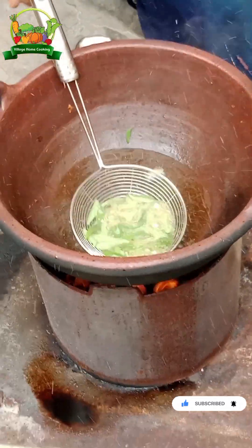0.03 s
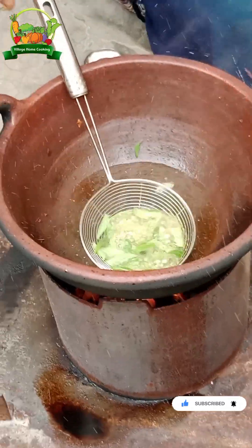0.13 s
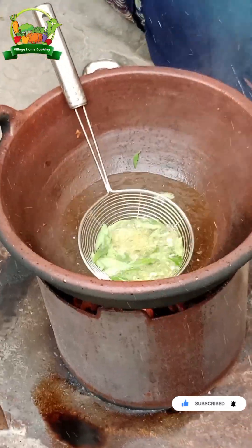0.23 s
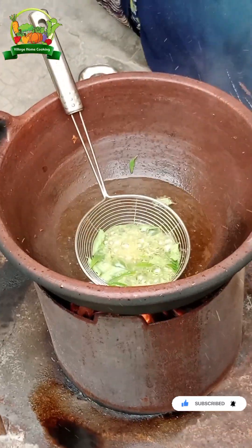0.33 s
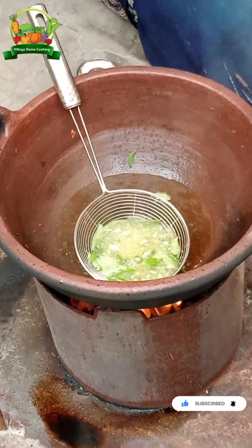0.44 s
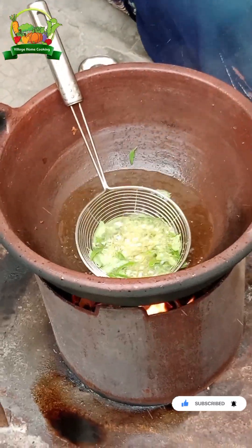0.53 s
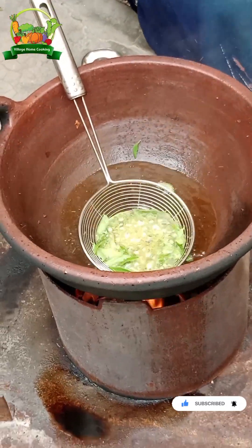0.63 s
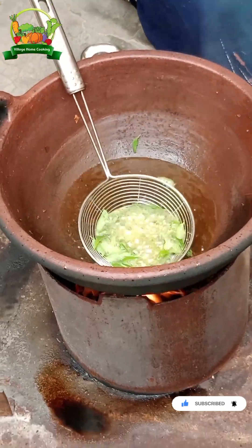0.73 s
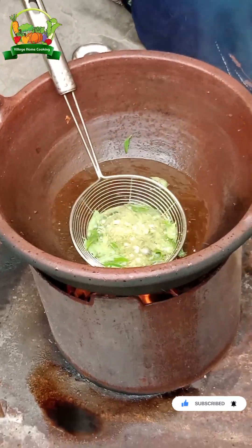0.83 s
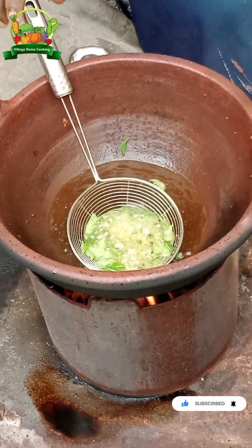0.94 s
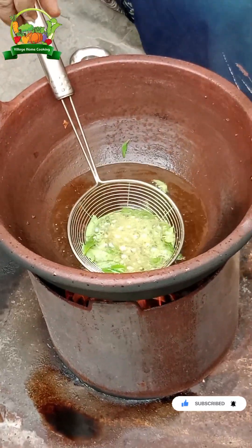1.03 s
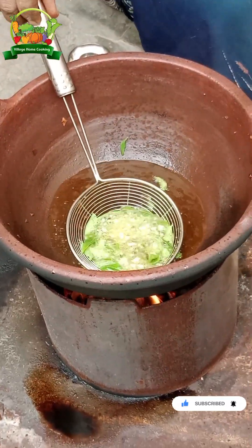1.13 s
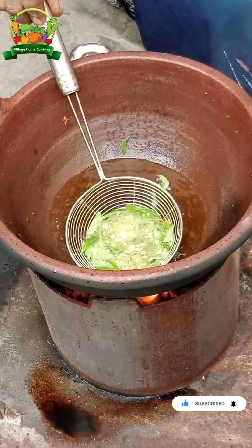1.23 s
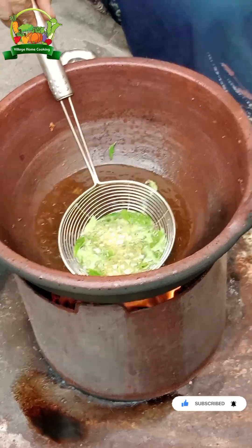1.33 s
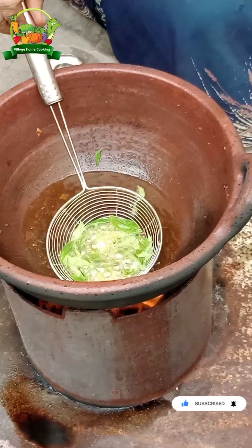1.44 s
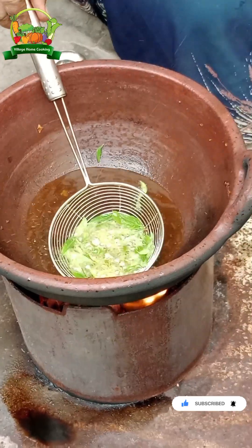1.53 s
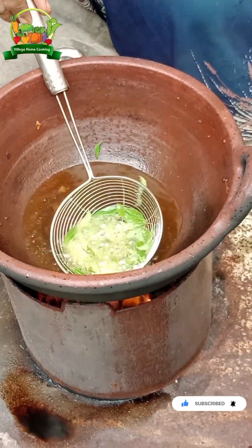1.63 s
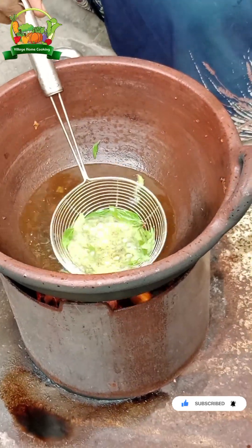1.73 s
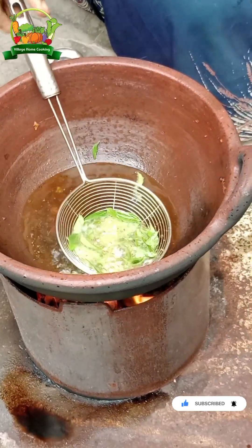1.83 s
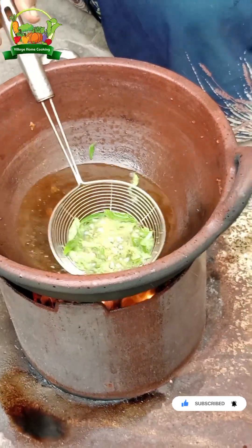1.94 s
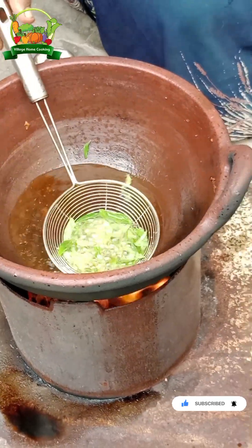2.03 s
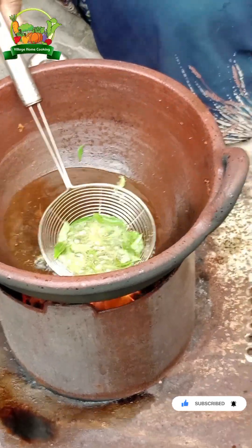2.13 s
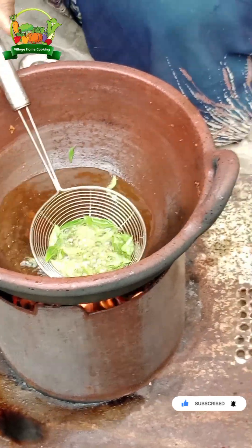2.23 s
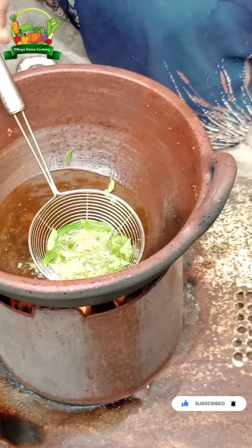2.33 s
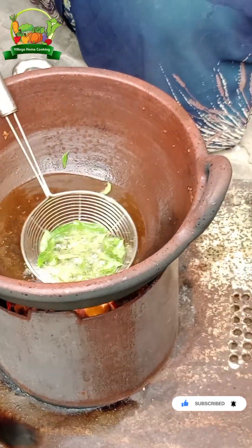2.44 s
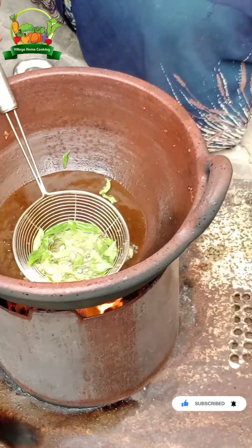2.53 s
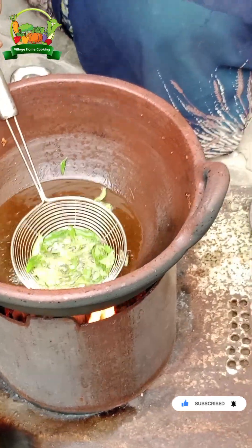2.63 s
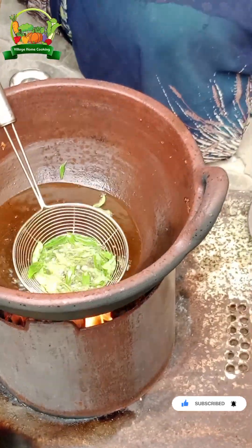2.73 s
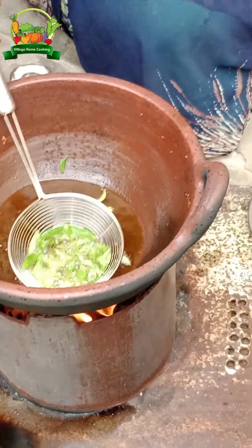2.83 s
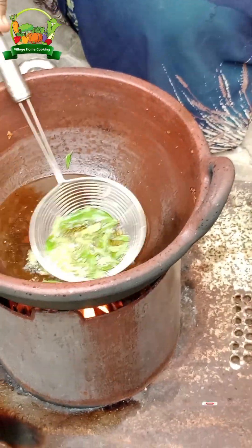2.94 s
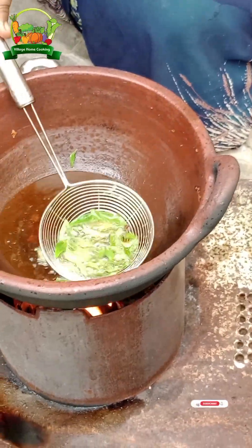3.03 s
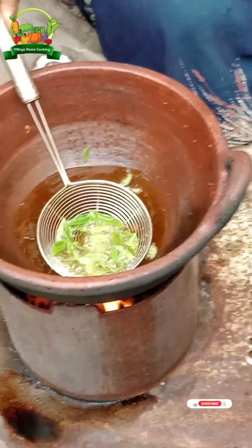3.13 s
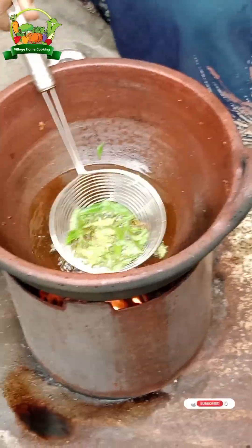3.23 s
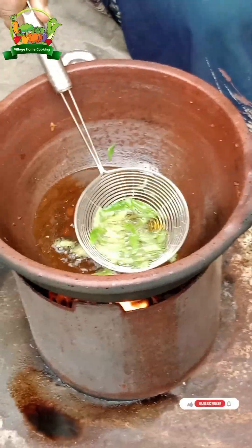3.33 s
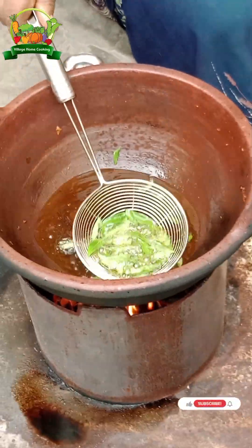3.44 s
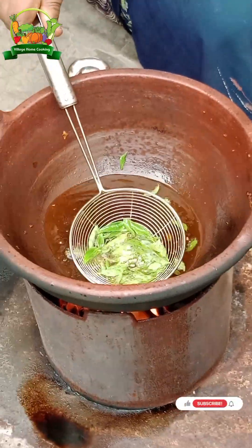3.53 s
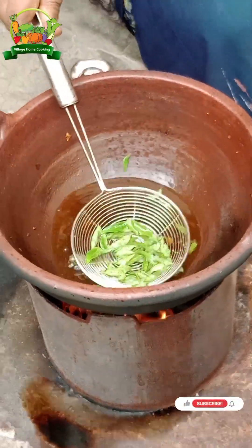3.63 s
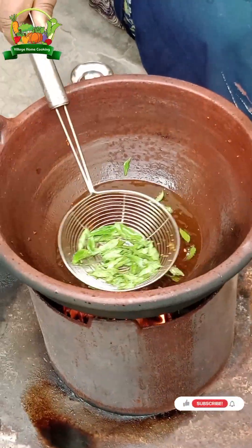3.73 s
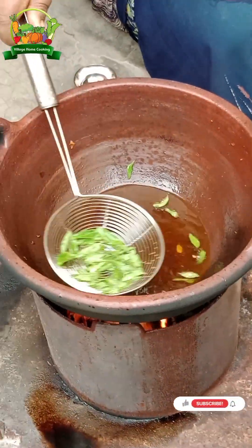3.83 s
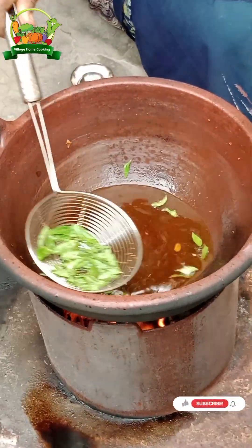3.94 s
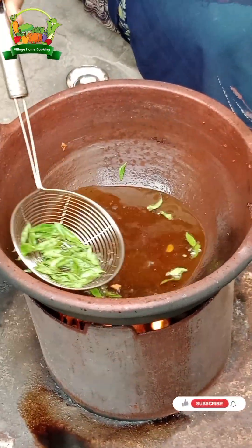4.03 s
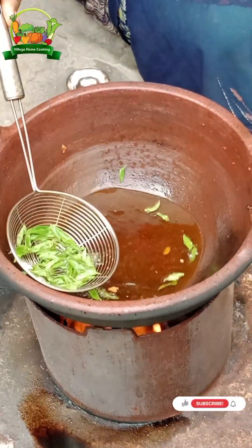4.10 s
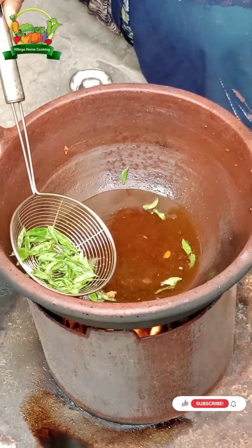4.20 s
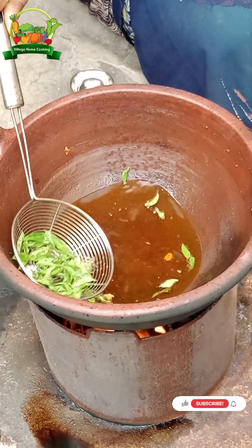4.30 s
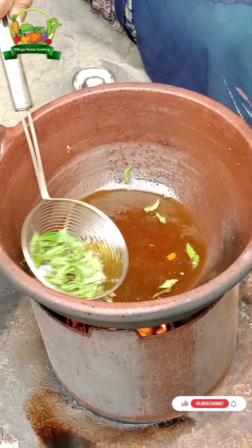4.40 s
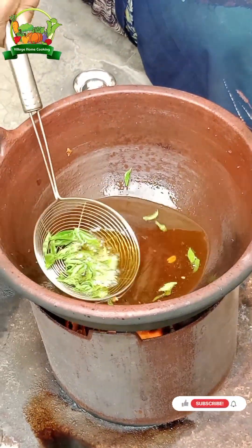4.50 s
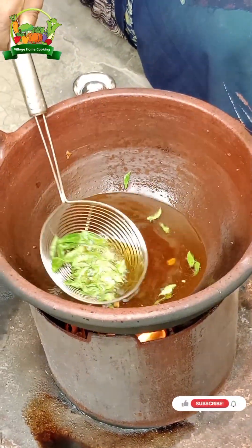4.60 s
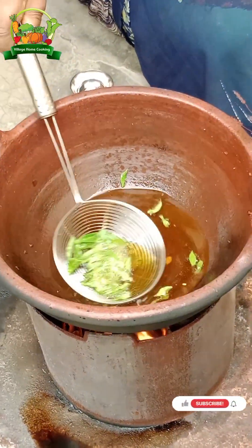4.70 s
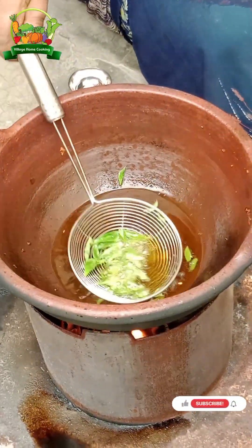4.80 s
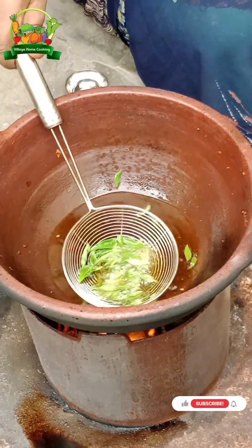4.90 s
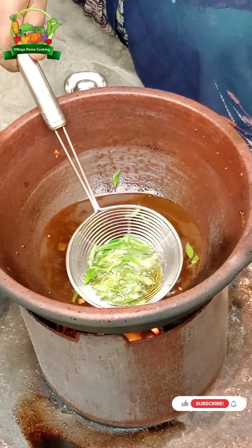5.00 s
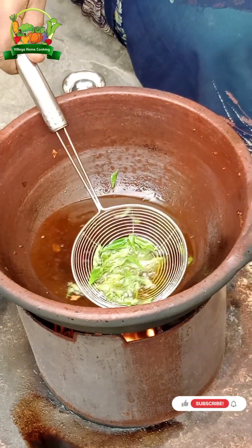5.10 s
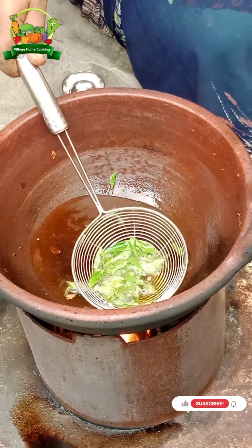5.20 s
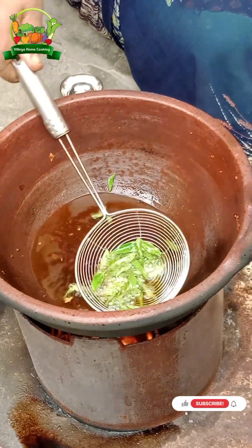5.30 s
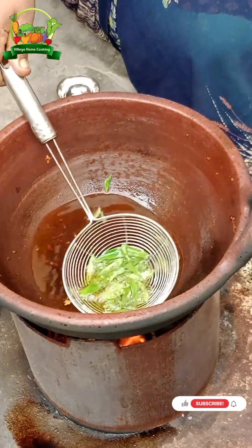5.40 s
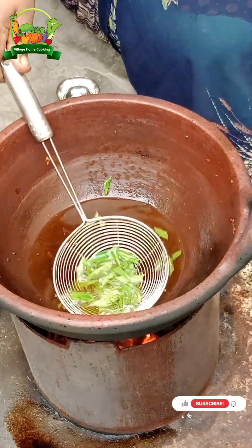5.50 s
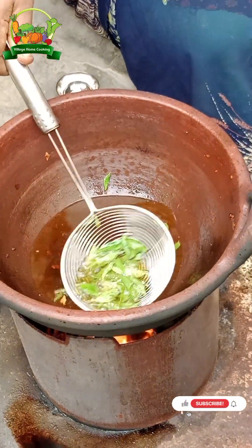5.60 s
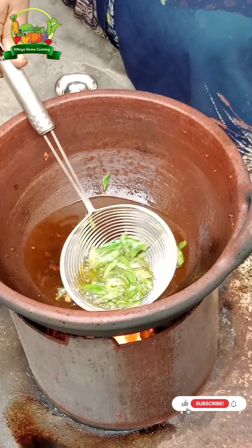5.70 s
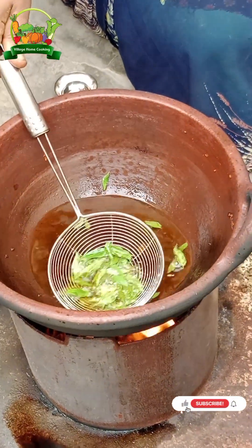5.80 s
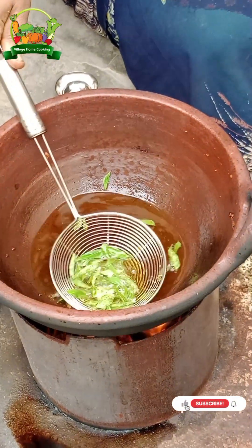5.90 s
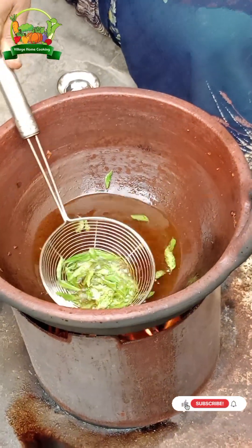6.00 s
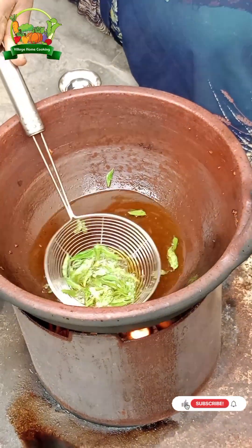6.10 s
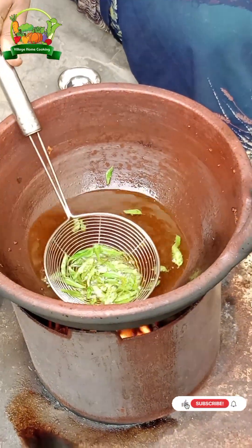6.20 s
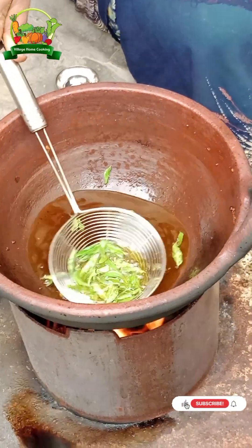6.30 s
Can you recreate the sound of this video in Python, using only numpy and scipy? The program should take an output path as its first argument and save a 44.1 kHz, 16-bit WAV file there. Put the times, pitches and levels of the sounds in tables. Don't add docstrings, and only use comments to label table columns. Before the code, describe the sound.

A violent sizzle starts immediately: hollow, woody-sounding oil pops packed close together over fizzing hiss, ringing in a deep clay pot. It surges in uneven bursts, thins out and becomes isolated ticks and spits. A metal skimmer rubs faintly on the clay and finally thuds against it. Low flames flutter underneath. Close, dry outdoor phone pickup, with noise reduction making the calm part patchy and nearly silent between pops.

```python
import sys
import numpy as np
from scipy import signal
from scipy.fft import rfft, irfft
from scipy.io import wavfile
from scipy.ndimage import uniform_filter1d

SR = 44100
rng = np.random.default_rng(int(sys.argv[2]) if len(sys.argv) > 2 else 0)


def dump(signal):
    limited = np.clip(np.atleast_2d(signal).T, -1, 1)
    pcm = np.round(limited * 32767).astype(np.int16)
    wavfile.write(sys.argv[1], SR, pcm)


def boost_factor(decibels):
    exponent = np.asarray(decibels, float) / 20
    return 10 ** exponent


N = 280035


def level(x, db):
    return x * boost_factor(db) / np.sqrt(np.mean(x ** 2))


def shape(x, gain_db):
    cep = irfft(gain_db * np.log(10) / 20, N)
    cep[1:N // 2] *= 2
    cep[N // 2 + 1:] = 0
    return irfft(rfft(x) * np.exp(rfft(cep)), N)


def colour(table):
    hz, db = np.transpose(table)
    return np.interp(np.log(np.fft.rfftfreq(N, 1 / SR) + 1), np.log(hz), db)


def resonate(x, hz, width_hz):
    return signal.lfilter(*signal.iirpeak(hz, hz / width_hz, fs=SR), x)


def curve(table):
    s, *columns = np.transpose(table)
    return [np.interp(np.arange(N) / SR, s, c) for c in columns]


def walk(rate):
    hold = int(SR / rate)
    steps = np.repeat(rng.standard_normal(N // hold + 1), hold)[:N]
    return 1.2 * uniform_filter1d(steps, hold)


def bump(s, length_s):
    return np.exp(-((np.arange(N) / SR - s) / length_s) ** 2)


def sizes(count, spread_db):
    spread = boost_factor(spread_db * rng.exponential(size=count).clip(0, 4))
    return rng.standard_normal(count).clip(-2, 2) * spread


def lowpass(x, order, hz):
    return signal.butter(order, hz, fs=SR, output="sos")


def bands(x):
    low, mid = (signal.sosfiltfilt(lowpass(x, 4, hz), x) for hz in (1500, 4000))
    return low, mid - low, x - mid


def dull(x):
    return signal.sosfilt(lowpass(x, 4, 7500), x)


def bursts():
    # start in seconds, strength in dB, pitch in Hz.
    plunge = [(0.0066, -24, 998), (0.0143, -27.5, 696), (0.0215, -30, 804), (0.036, -24, 1500),
              (0.0481, -25.5, 1100), (0.0569, -22, 5440), (0.0818, -24.5, 4200), (0.0717, -32, 1200),
              (0.0895, -30.5, 892), (0.0989, -27, 1526), (0.109, -25, 1000), (0.116, -26.5, 1500),
              (0.1348, -19.5, 2000), (0.1826, -24, 1907), (0.2109, -27.5, 1995), (0.2293, -25, 892),
              (0.2479, -27, 5610), (0.268, -25, 1686), (0.299, -25, 3713), (0.3241, -22.5, 1102),
              (0.3526, -27.5, 2003), (0.3596, -29.5, 893), (0.4476, -24, 1395), (0.4545, -28, 5640),
              (0.479, -34, 2075), (0.5197, -28, 4950), (0.5558, -27.5, 1390), (0.6319, -26.5, 810),
              (0.6388, -41, 5700), (0.6515, -24.5, 2630), (0.6797, -27.5, 1300), (0.7195, -29.5, 5550),
              (0.7747, -34.5, 810)]
    # start in seconds, strength in dB, pitch in Hz.
    gushes = [(0.8337, -68, 2400), (0.8582, -38, 5650), (0.88, -30, 1130), (0.8994, -31.5, 5600),
              (0.9287, -31, 3170), (0.9409, -29.5, 1530), (1.0087, -30, 1730), (1.0283, -28, 1010),
              (1.0429, -26.5, 1620), (1.0758, -27.5, 1500), (1.0936, -31, 1300),
              (1.1069, -32.5, 1000), (1.1337, -30, 1100), (1.1737, -34.5, 800), (1.2104, -38, 1420),
              (1.2739, -73, 4500), (1.2904, -33, 3000), (1.3069, -32, 2100), (1.3189, -32.5, 1500),
              (1.3353, -51, 5560), (1.354, -24, 980), (1.4062, -33, 1370), (1.4334, -26, 1073),
              (1.45, -42, 1300), (1.464, -23.5, 4200),
              (1.4858, -27, 1090), (1.5116, -21.5, 1480), (1.5184, -27, 4900), (1.5487, -26, 1200),
                   (1.5621, -27.5, 1410), (1.5775, -30.5, 900), (1.5892, -33, 1200), (1.595, -24, 4550),
                   (1.6125, -57, 4200), (1.6218, -28.5, 1130), (1.6358, -29, 1190), (1.729, -29.5, 1690),
                   (1.7514, -24, 1520), (1.7795, -28.5, 5600), (1.8018, -32.5, 860), (1.8188, -24.5, 2000),
                   (1.858, -31.5, 1400), (1.892, -32.5, 1100), (1.911, -25, 3300), (2.005, -37.5, 4200),
                   (2.0449, -31, 2920), (2.1052, -62, 5600), (2.1752, -43, 5200), (2.2158, -32, 2060),
                   (2.2615, -21.5, 1450)]
    # start in seconds, strength in dB, pitch
    # in Hz.
    crowd = [(0.1515, -30, 1800), (0.1627, -33.5, 1800), (0.2224, -35, 3200), (0.2783, -24.5, 1800),
             (0.311, -30.5, 2200), (0.3698, -33.5, 1300), (0.3875, -38, 3104), (0.3945, -36, 1800),
             (0.417, -35.5, 1600), (0.4347, -37.5, 1200), (0.4405, -38.5, 1300), (0.4617, -33, 1698),
             (0.4846, -37, 2900), (0.4934, -29, 1396), (0.5317, -26.5, 2200), (0.5728, -32.5, 1400),
             (0.5812, -37.5, 1500), (0.5879, -36.5, 2100), (0.5937, -39, 1300), (0.6004, -31, 1900),
             (0.658, -33, 3300), (0.6626, -39.5, 3200), (0.7114, -33, 1300), (0.7345, -33.5, 1500),
             (0.743, -33.5, 1000), (0.7511, -30.5, 2300), (0.791, -54, 2300),
             (0.9585, -43, 2300), (1.0815, -39, 1810), (1.0992, -38, 1300), (1.1504, -33, 1100),
                  (1.158, -35.5, 1400), (1.1832, -41, 1500), (1.2174, -43, 1800), (1.2997, -34.5, 2400),
                  (1.37, -37.5, 1600), (1.4986, -35.5, 1700), (1.5254, -41, 3700), (1.5725, -29.5, 2000),
                  (1.646, -42.5, 1400), (1.6633, -44.5, 2000), (1.733, -31, 1510), (1.7448, -35, 1500),
                  (1.8076, -44, 1400), (1.8355, -46, 2400), (1.926, -33, 3500), (1.9411, -39, 2400),
                  (2.0577, -45.5, 2080), (2.0641, -37, 2400), (2.2324, -42.5, 2500), (2.2786, -38, 1617),
                  (2.291, -41, 1900)]
    # start in seconds, strength in dB, pitch in Hz, focus in dB
    lone_pops = [(2.447, -42, 5500, 14), (2.505, -25, 4700, 2), (2.651, -44.5, 5000, 2.5),
                 (2.6892, -35, 3420, 15.5), (2.7187, -35.5, 3170, 7), (2.773, -34, 2900, 7),
                 (2.9002, -53, 2800, 23), (2.956, -38.5, 3060, 10), (3.0075, -36, 2200, 20),
                 (3.0817, -56, 2400, 14), (3.1106, -47.5, 5500, 5), (3.2286, -35, 2300, 6),
                 (3.2603, -37, 4800, 8), (3.2788, -30, 3840, 6.5), (3.331, -42.5, 5500, 1),
                 (3.382, -31.5, 1620, 4.5), (3.4303, -27, 2450, 1.5), (3.509, -30, 3800, 13.5),
                 (3.541, -41.5, 4500, 4), (3.57, -39.5, 4000, 4), (3.6137, -60, 5500, 16.5),
                 (3.6376, -41.5, 4020, 3), (3.7199, -42.5, 3200, 7.5), (3.7508, -45, 3420, 20.5),
                 (3.8161, -36.5, 5000, 7), (3.8897, -45, 5020, 15), (3.9074, -40, 4000, 15.5),
                 (3.958, -51.5, 5460, 14), (4.0558, -47, 4500, 13.5), (4.122, -57, 5500, 6),
                 (4.2, -63, 5500, 13.5),
                 (4.416, -61.5, 2290, 12), (4.429, -47.5, 3000, 20), (4.531, -47, 1890, 7),
                (4.553, -51.5, 1700, 4), (4.631, -56, 2400, 5.6), (4.668, -47.5, 2290, 13),
                (4.698, -33.5, 4540, 10.2), (4.7233, -36.5, 3500, 11), (4.7624, -30, 2550, 13),
                (4.7791, -28, 5100, 3.35), (4.8599, -33.5, 3460, 7.2), (4.879, -41.5, 4970, 1.5),
                (4.9036, -40, 4900, 2.1), (4.9533, -43, 4170, 4.6), (5.102, -57, 1590, 7),
                (5.14, -40.5, 2550, 14), (5.236, -54.5, 5030, 12), (5.311, -45, 4160, 5.2),
                (5.3524, -47.5, 5000, 9.3), (5.4342, -37, 4150, 5.6), (5.4631, -41, 5000, 0.88),
                (5.509, -32.5, 3020, 26), (5.521, -51, 3540, 14), (5.587, -41, 5100, 1.4),
                (5.611, -47.5, 1500, 9), (5.7478, -51, 1660, 8.3), (5.848, -39, 2500, 3.4),
                (6.3356, -64, 784, 4.7)]
    band_hz = np.array([800, 2400, 5500])
    band_db = np.array([1.5, -0.5, -8.5])
    usual_focus_db = 2.5
    boiling = plunge + gushes + crowd
    rows = [(*pop, usual_focus_db) for pop in boiling] + lone_pops
    return [(s, *(db + band_db - abs(focus) * np.abs(np.log2(band_hz / hz)))) for s, db, hz, focus in rows]


def pot(x, ring_db):
    # frequency in Hz, level in dB per Hz.
    pop_colour = [(120, -79.5), (200, -21.5), (390, -23), (520, -3.5), (700, -5), (1300, -2), (2030, -7),
                  (3200, -9), (4200, -10.5), (6400, -12), (7900, -25), (10000, -32.5), (13800, -58),
                  (15000, -51), (16500, -81.5)]
    # frequency in Hz, width in Hz, level in dB.
    modes = [(532.4, 50, 0), (676.5, 50, 8.5), (833, 130, -5), (965, 25, -3.5), (1189, 28, -9.5),
             (1288, 35, 2.5), (1856, 13, -9)]
    rings = sum(boost_factor(db) * resonate(x, hz, width_hz) for hz, width_hz, db in modes)
    return shape(x + boost_factor(ring_db) * rings, colour(pop_colour))


def echoes(x):
    # delay in milliseconds, level in dB.
    reflections = [(1.7, -22.5), (2.2, -13.5), (5.8, -10.5), (6.9, -11.5), (9.4, -15.5), (11.7, -21),
                   (17.0, -20)]
    taps = np.zeros(SR // 50)
    taps[0] = 1
    for ms, db in reflections:
        taps[int(ms * SR / 1000)] = boost_factor(db)
    return signal.fftconvolve(x, taps)[:N]


def wall():
    delay_ms, smear_ms, echo_db = 6.6, 1.17, 0
    smear = rng.standard_normal(SR // 100)[:int(smear_ms * SR / 1000)]
    smear = smear * np.hanning(len(smear))
    echo = boost_factor(echo_db) * smear / np.sqrt(np.sum(smear ** 2))
    return np.append(np.zeros(int(delay_ms * SR / 1000)), echo)


def pops(tail_db, t60s):
    # time in seconds, level in dB, decay factor.
    linger = [(0, 2, 0.62), (.8, 4, 1.08), (2.4, -0.5, 1.68), (4.2, 8.5, 0.96), (6.35, 6.5, 1.48)]
    crack_db = (4., 3.5, 4.5)
    direct_spit_db = -4.5
    ring_db = -2.
    cracks, tails = np.zeros((3, N + SR)), np.zeros((3, N + SR))
    t = np.arange(int(.16 * SR)) / SR
    spatter_curves = curve(linger)
    shut = np.clip(t / 0.0026, 0, 1) * np.clip((.13 - t) / 0.068, 0, 1)
    for s, *band_db in bursts():
        i = int(s * SR)
        drops = 4.5 * sizes(len(t), 2.0) * (rng.random(len(t)) < .03)
        spatter = (drops + .5 * rng.standard_normal(len(t))) * shut
        more_db, slower = (c[min(i, N - 1)] for c in spatter_curves)
        spit = boost_factor(band_db[-1] + crack_db[-1])
        bright = spit * wall()
        cracks[-1, i:i + len(bright)] += bright
        cracks[-1, i] += spit * (1 - boost_factor(direct_spit_db))
        for k, db in enumerate(band_db):
            cracks[k, i] -= boost_factor(db + crack_db[k])
            decay_db = db + more_db + tail_db[k] - 60 * t / (slower * t60s[k])
            tails[k, i:i + len(t)] += boost_factor(decay_db) * spatter
    tails = dull(tails)
    click = pot(np.roll(signal.unit_impulse(N), 500), ring_db)
    unit = [np.abs(signal.hilbert(b[:SR // 10])).max() for b in bands(click)]
    return sum(bands(pot(echoes(cracks[k, :N]) + tails[k, :N], ring_db))[k] / unit[k] for k in range(3))


def fizz():
    # time in seconds, fizz in dB, brightness in dB.
    boil = [(0.0, -36.5, -1.5), (0.3, -41, -2.5), (1.01, -54.5, 2), (1.7, -52, 4), (2.25, -57, 7.5),
            (2.42, -59.5, 5.5), (3.09, -64.5, 7), (3.46, -53, 4.5), (3.82, -67.5, 7.5), (4.24, -92.5, 15),
            (4.9, -70.5, 3.5), (6.35, -96, -17.5)]
    grains = sizes(N, 2.5) * (rng.random(N) < .012)
    grains = pot(dull(echoes(grains) + 0.14 * rng.standard_normal(N)), 0.8)
    fizz_db, bright_db = curve(boil)
    gaps_db = 2.5 * walk(70)
    boil_db = fizz_db - bright_db, fizz_db, fizz_db - 10 + 0.86 * bright_db
    return sum(level(b, -3.5) * boost_factor(db + 1.6 * walk(40) + gaps_db) for b, db in zip(bands(grains), boil_db))


def bounce(x):
    # time in seconds, share from 0 to 1.
    bounce_share = [(0, 0), (2.3, .1), (3.0, .3), (4.4, .6), (5.0, .6), (5.3, .35), (6.35, .4)]
    delay_ms, kept = 3.13, .6
    loop = np.zeros(int(delay_ms * SR / 1000) + 1)
    loop[0], loop[-1] = 1, -kept
    share = curve(bounce_share)[0]
    return (1 - share) * x + share * np.sqrt(1 - kept ** 2) * signal.lfilter([1], loop, x)


def suppress(x, patchy_db, least_db):
    # time in seconds, bar over the usual level in dB, blotches in dB.
    bar = [(0, -17, 0), (2.1, -13, 1), (2.6, -8, 3.5), (6.35, -7, 5)]
    _, s, z = signal.stft(x, SR, nperseg=512, noverlap=384)
    power = uniform_filter1d(np.abs(z) ** 2, size=9, axis=1) + 1e-18
    usual = uniform_filter1d(uniform_filter1d(power, size=200, axis=1), size=9, axis=0)
    streaks = uniform_filter1d(rng.standard_normal(z.shape), size=36, axis=1) * np.sqrt(36)
    blotches = uniform_filter1d(streaks, size=8, axis=0) * np.sqrt(8)
    times, bar_db, blotch_db = np.transpose(bar)
    threshold = usual * boost_factor(2 * (np.interp(s, times, bar_db) + patchy_db * streaks))
    gain = np.clip(1 - threshold / power, boost_factor(least_db), 1)
    gain = gain * boost_factor(np.interp(s, times, blotch_db) * (blotches + streaks / 2))
    gain = uniform_filter1d(gain, size=3, axis=1)
    return signal.istft(z * gain, nperseg=512, noverlap=384)[1][:N]


def fire():
    # time in seconds, rumble in dB.
    rumble = [(0.0, -81), (1.63, -73.5), (1.95, -58), (2.07, -75.5), (2.2, -64), (2.3, -68), (2.71, -53),
              (2.78, -75.5), (2.99, -56), (3.62, -61), (3.68, -66.5), (4.47, -54.5), (4.76, -72),
              (4.83, -56), (5.33, -56), (5.4, -69.5), (5.48, -58), (6.35, -55)]
    # frequency in Hz, level in dB per Hz.
    flame_colour = [(12, -45), (25, -17.5), (52, 0), (70, 9), (139, -0.5), (172, -25.5), (247, -32),
                    (300, -17), (390, -63.5), (660, -120)]
    # time in seconds, level in dB.
    lulls = [(.8, -7), (2.37, -7), (2.86, -7), (3.17, -8.5), (3.95, -9.5), (4.27, -9), (4.66, -9),
             (5.0, -2.5), (5.72, -4), (5.92, -4)]
    roar = level(shape(rng.standard_normal(N), colour(flame_colour)), -0.47)
    lull_db = sum(db * bump(s, 0.032) for s, db in lulls)
    return roar * boost_factor(curve(rumble)[0] + 2.6 * walk(10) + lull_db)


def yard():
    # frequency in Hz, level in dB per Hz.
    air_colour = [(88, -18), (150, 1), (230, -11.5), (350, -8.5), (700, -16.5), (3100, -32), (5900, -35.5),
                  (7700, -44), (10000, -48), (16000, -43)]
    air = level(shape(rng.standard_normal(N), colour(air_colour)), -74.5)
    breeze_db = 4 * bump(4.24, 0.088)
    return air * boost_factor(1.2 * walk(12) + breeze_db)


def rubs():
    # start in seconds, length in seconds, pitch in Hz, level in dB, glide ratio.
    songs = [(1.9, 0.16, 1314, -80.5, 1.15), (2.529, 0.124, 523, -58, 1.01), (2.6, .26, 928, -59.5, 1.092),
             (2.977, 0.1644, 657, -48.5, .97), (2.96, 0.45, 1270, -73.5, .98),
             (3.199, .2, 640, -59.5, 0.99), (3.35, 0.074, 630, -49.5, 1.04),
             (3.477, 0.268, 882, -64.5, 1.084), (3.461, 0.2, 1217, -62, 1.01),
             (4.276, 0.086, 705, -74, 0.99), (4.499, 0.102, 651, -60.5, 1.025), (4.779, 0.3, 955, -62.5, 1),
             (4.751, 0.34, 659, -63, 0.97), (4.69, 0.3, 1295, -74, 1), (5.049, .18, 634, -58, 0.97),
             (5.462, 0.221, 635, -52, 1.0), (5.57, 0.19, 765, -61.5, .99), (3.11, 0.112, 660, -69, .97),
             (1.7, .12, 490, -58.5, .93), (2.62, .36, 1900, -77, 1.02), (5.763, 0.018, 740, -48, 1.004),
             (5.743, .025, 740, -63, 1), (5.81, .09, 670, -57, 1.03), (2.3, 0.35, 1310, -73, 1),
             (6.03, 0.21, 1172, -69.5, 0.995), (5.585, 0.117, 1290, -72, 1), (5.05, .09, 410, -58.5, 1.03),
             (6.19, .06, 770, -74.5, 1.2), (6.048, .065, 1850, -74, 1.02), (6.188, .1, 1960, -77.5, 0.87)]
    # start in seconds, length in seconds, pitch in Hz, level in dB.
    scrapes = [(1.893, .11, 470, -44), (2.275, .1, 562, -54.5), (2.46, .05, 521, -59),
               (2.42, .065, 535, -48), (5.03, .13, 500, -55), (0, .07, 380, -55), (5.79, .1, 1050, -62),
               (2.54, .09, 672, -59), (2.885, .05, 480, -69), (5.15, .11, 490, -60), (5.46, .1, 500, -55),
               (6.308, .066, 535, -65), (5.462, .09, 660, -51)]
    # start in seconds, length in seconds, pitch in Hz, level in dB.
    hisses = [(2.686, .07, 4120, -59), (2.868, .1, 3810, -67), (3.5092, 0.018, 3650, -55),
              (3.5396, .02, 3420, -63), (3.5685, .02, 3500, -61), (3.712, .03, 5300, -66),
              (3.7282, 0.034, 5300, -64), (3.7496, .07, 4100, -58.5), (3.778, 0.049, 2400, -73),
              (3.815, 0.048, 3480, -59.5), (3.8953, 0.054, 5350, -68.5), (3.9058, 0.062, 2830, -67.5),
              (3.9582, 0.062, 5880, -69), (4.046, .11, 4730, -68.5), (4.0534, 0.044, 5280, -62.5),
              (4.1048, 0.054, 5310, -71), (4.1203, 0.043, 6140, -65), (5.1, .13, 2650, -67.5),
              (5.512, 0.067, 4320, -65.5), (5.75, 0.2, 2170, -78.5)]
    # start in seconds, length in seconds, pitch in Hz, level in dB.
    flecks = [(2.955, 0.037, 2020, -63.5), (3.0, 0.17, 2420, -73), (3.905, 0.0305, 1870, -76),
              (4.108, 0.04, 2360, -79), (4.412, .06, 1650, -76.5), (4.412, 0.12, 2240, -75),
              (4.425, 0.048, 2850, -68), (4.49, 0.058, 1906, -71.5), (4.528, .05, 2560, -73),
              (4.53, 0.089, 1270, -71), (4.535, 0.057, 2250, -75.5), (4.628, 0.034, 1950, -68),
              (4.628, 0.02, 2480, -73.5), (5.308, 0.047, 1284, -70.5), (5.395, 0.085, 1300, -78.5),
              (5.13, 0.056, 1214, -75.5), (5.845, .05, 1193, -60), (6.06, 0.036, 2220, -84),
              (6.23, .05, 2235, -80.5)]
    rows = [(s, length, hz, 0.085 * hz, db, glide, .5, .8) for s, length, hz, db, glide in songs]
    for table, share, swell in ((scrapes, 0.4, .55), (hisses, 0.22, 0), (flecks, 0.05, .28)):
        rows += [(s, length, hz, share * hz, db, 1.0, swell, 0) for s, length, hz, db in table]
    return rows


def knock():
    # frequency in Hz, level in dB, t60 in seconds.
    clay_rings = [(756, -34.5, 0.067), (1130, -40, 0.078), (1250, -50, 0.15), (930, -46, 0.11)]
    start_hz, sag_hz_per_s, thud_db, hold_s = 230.4, 1740, -29, 0.028
    t = np.arange(SR // 10) / SR
    turns = np.cumsum(np.maximum(start_hz - sag_hz_per_s * t, 90)) / SR
    thud = np.clip(t / 0.0035, 0, 1) * boost_factor(thud_db) * np.exp(-(t / hold_s) ** 2) * np.sin(2 * np.pi * turns)
    rings = sum(boost_factor(db - 60 * t / t60) * np.sin(2 * np.pi * hz * t) for hz, db, t60 in clay_rings)
    return thud + np.clip(t / 0.0026, 0, 1) * rings


def skimmer():
    knock_s, flutter_db = 5.776, 2.5
    ping_rise_s, ping_fall_db = 0.0011, 27.5
    out = np.zeros(N + SR)
    for s, length, hz, width_hz, db, glide, swell, steady in rubs():
        u = np.linspace(0, 1, int(length * SR))
        noise = rng.standard_normal((2, SR // 2))
        waver = signal.sosfilt(lowpass(noise, 3, max(width_hz, 40) / 2), noise)[:, -len(u):]
        turns = np.cumsum(hz * glide ** np.minimum(2 * u, 1)) / SR
        wavering = steady * np.std(waver) + waver[0] + 1j * waver[1]
        song = np.real(wavering * np.exp(2j * np.pi * turns))
        if swell:
            envelope = np.sin(np.pi * u ** swell)
        else:
            envelope = np.clip(u * length / ping_rise_s, 0, 1) * boost_factor(-ping_fall_db * u) * (1 - u ** 4)
        out[int(s * SR):int(s * SR) + len(u)] += level(song * envelope, db)
    out = out[:N] * boost_factor(flutter_db * walk(45))
    thud = knock()
    out[int(knock_s * SR):int(knock_s * SR) + len(thud)] -= thud
    return out


def snaps():
    # start in seconds, level in dB.
    sharpest = [(0.2818, -52.5), (0.3516, -61.5), (0.4534, -61.5), (0.6569, -65), (1.4123, -58.5),
                (1.4651, -55.5), (1.735, -49.5), (1.8239, -50.5), (1.915, -53.5), (2.212, -55),
                (2.26, -48.5), (2.5046, -66.5), (1.3555, -73), (1.487, -50.5), (1.52, -55), (1.55, -55),
                (1.582, -56), (1.785, -66), (1.863, -52), (0.05, -54), (0.09, -56.5), (0.142, -57),
                (3.2836, -59), (3.4353, -50), (3.5399, -62), (3.8138, -59), (4.7032, -66.5), (5.5904, -57)]
    low_hz, tilt_db, t60_s = 7080, -20.5, 0.044
    out, t = np.zeros(N + SR), np.arange(SR // 20) / SR
    for s, db in sharpest:
        spray = rng.standard_normal(len(t)) * boost_factor(db - 60 * t / t60_s) * np.clip(t / .003, 0, 1)
        out[int(s * SR):int(s * SR) + len(t)] += spray
    slope = colour([(low_hz / 2, -60), (low_hz, 0), (2 * low_hz, tilt_db), (15800, tilt_db - 4), (16800, -50)])
    return shape(out[:N], slope + 10.0)


def scene():
    oil = pops(tail_db=(-33.5, -29.5, -28.5), t60s=(.2, .18, .15)) + fizz()
    near = suppress(bounce(oil), patchy_db=5.5, least_db=-17.)
    return (near + fire() + yard() + skimmer() + snaps())[None]


def low_pass(x):
    return signal.sosfilt(signal.butter(12, 15800, fs=SR, output="sos"), x)


def record(dry):
    return low_pass(dry)


dry = scene()
out = record(dry)
dump(out)
```